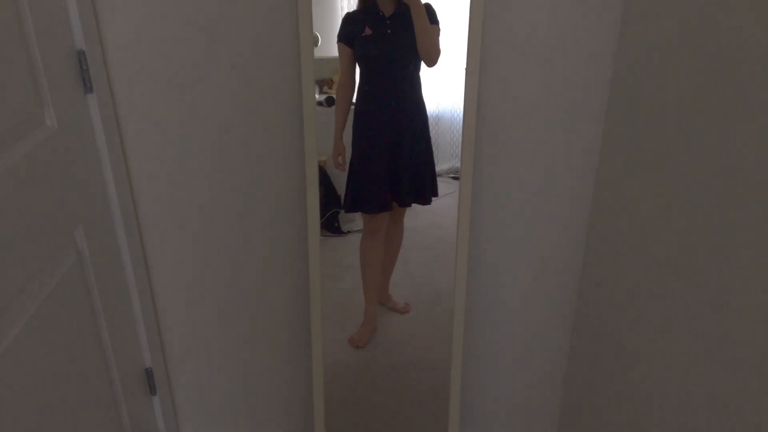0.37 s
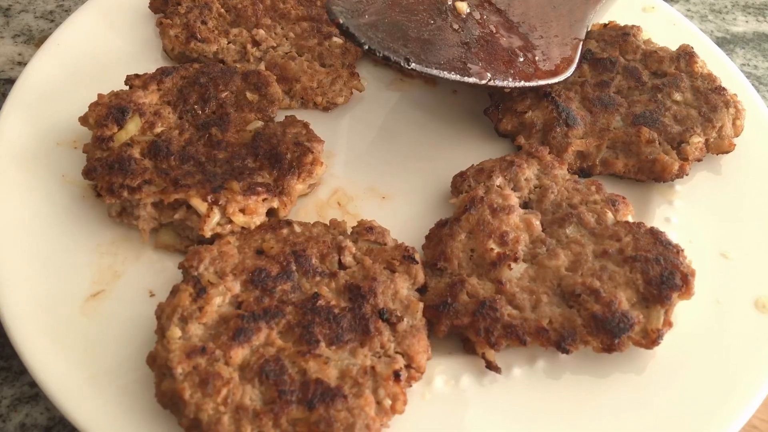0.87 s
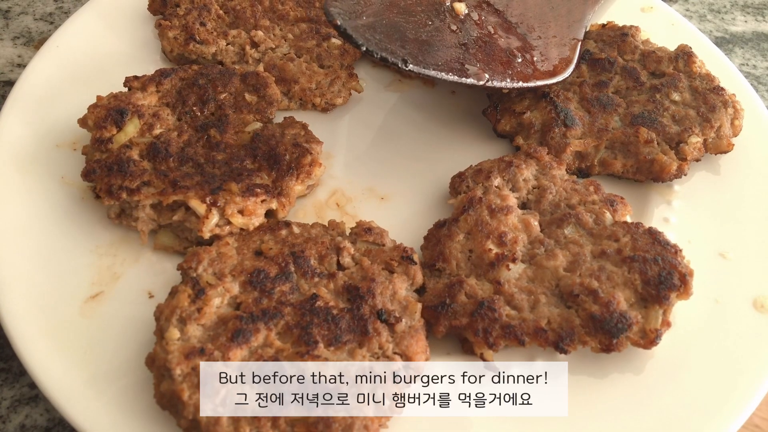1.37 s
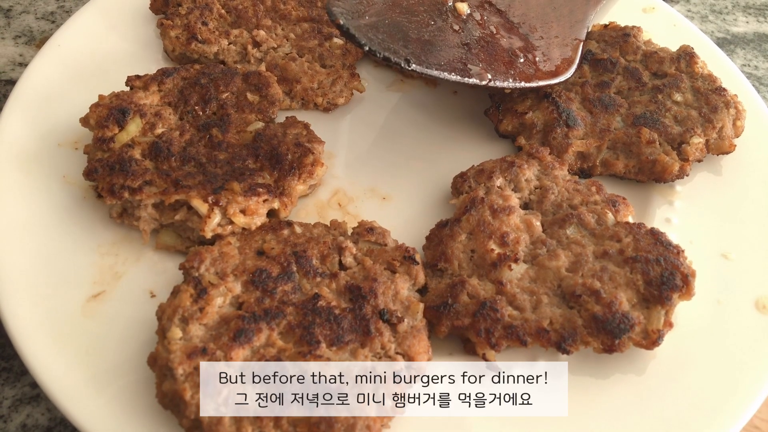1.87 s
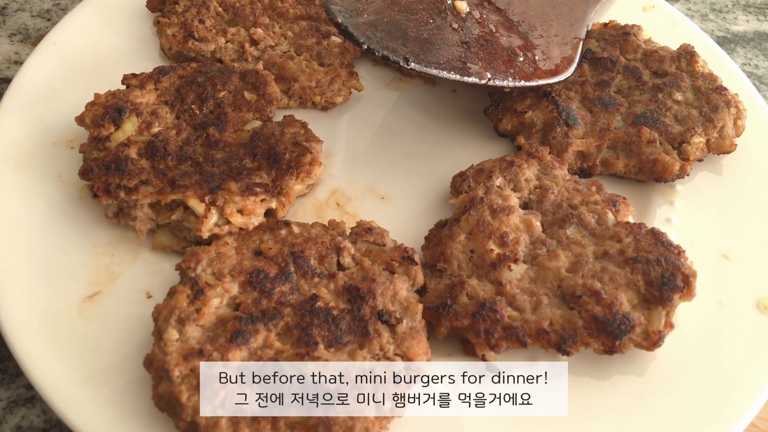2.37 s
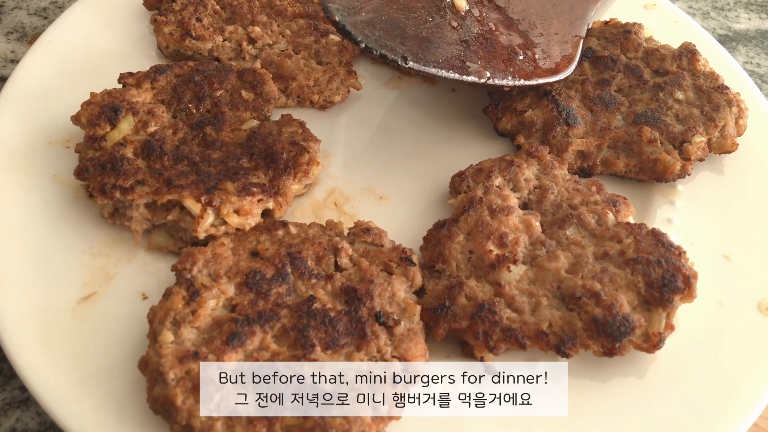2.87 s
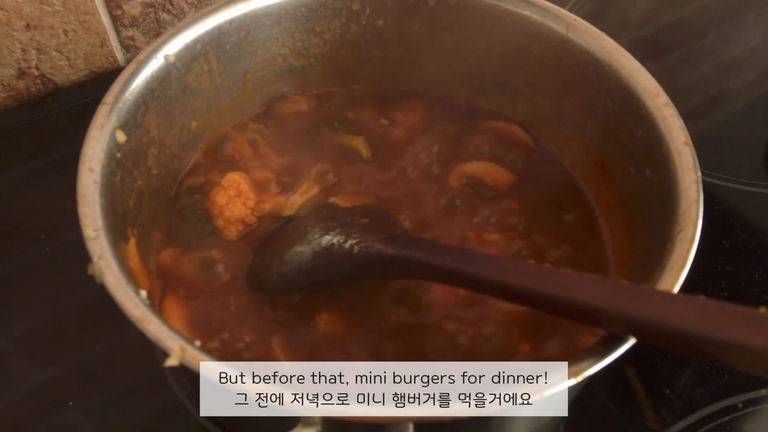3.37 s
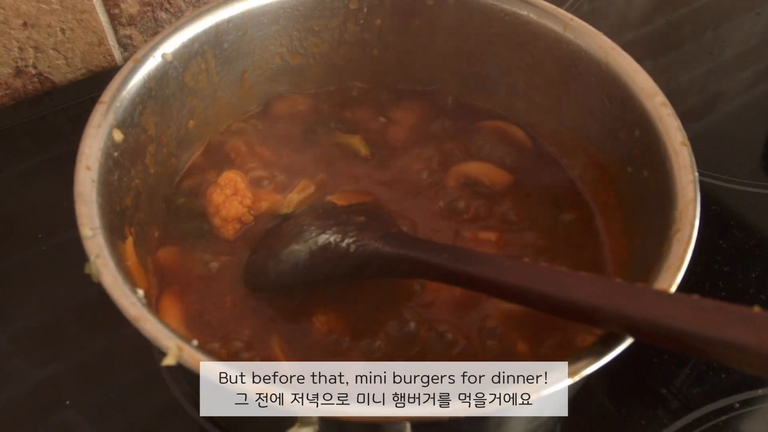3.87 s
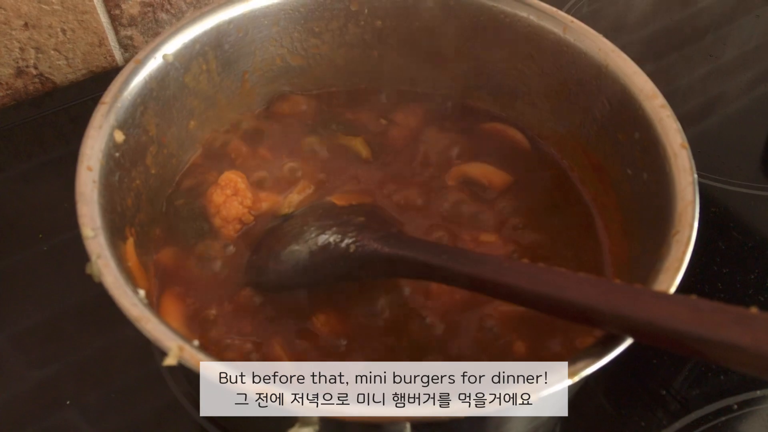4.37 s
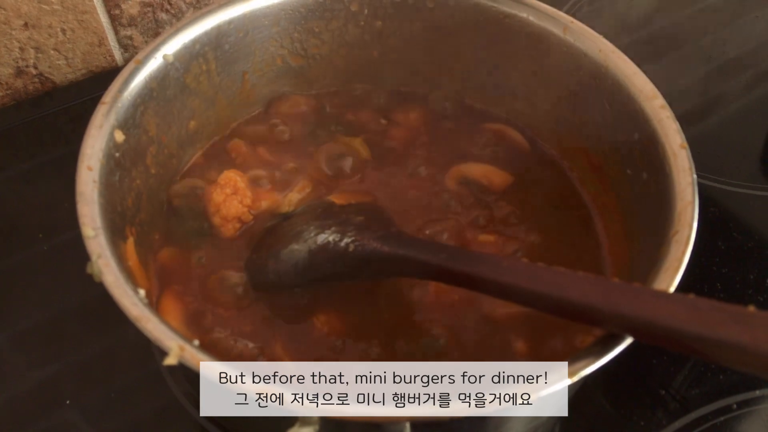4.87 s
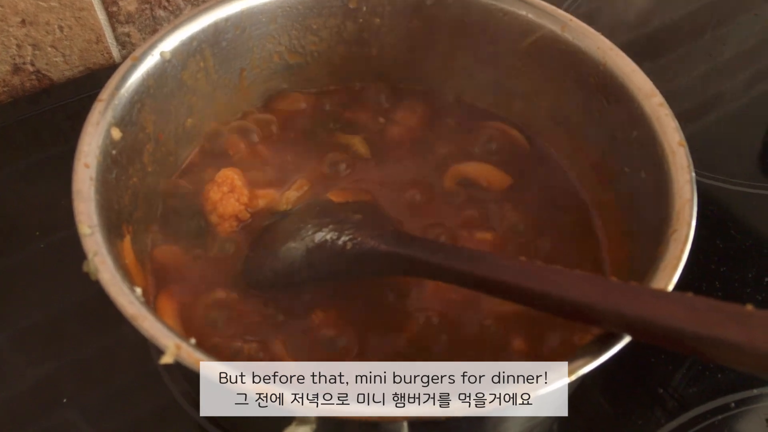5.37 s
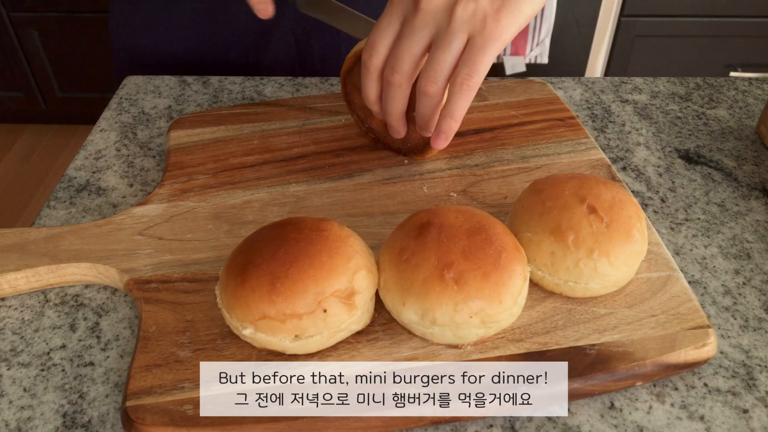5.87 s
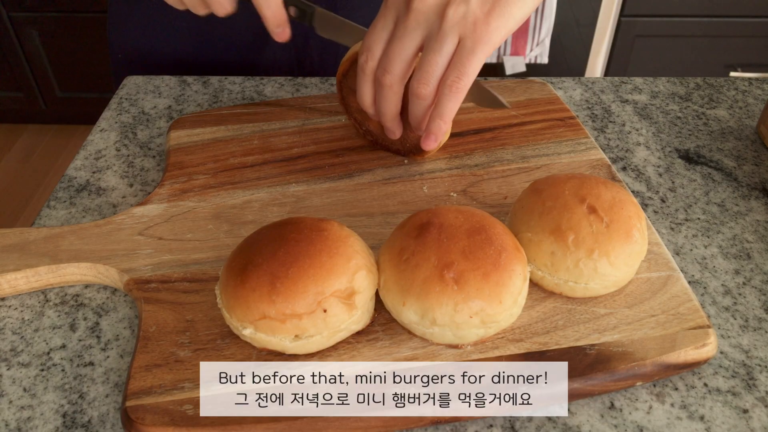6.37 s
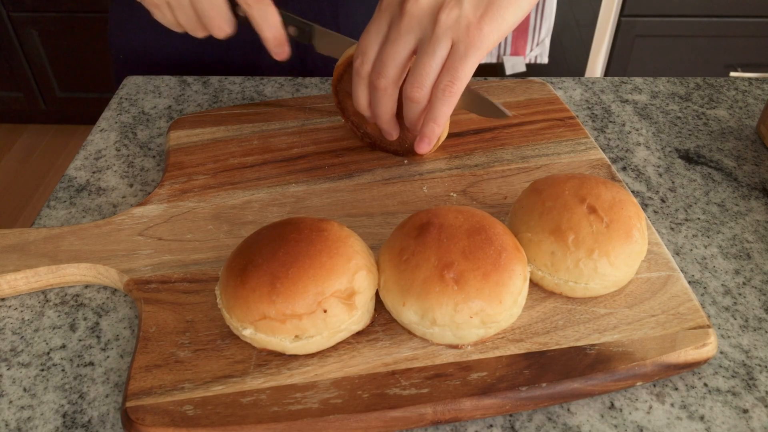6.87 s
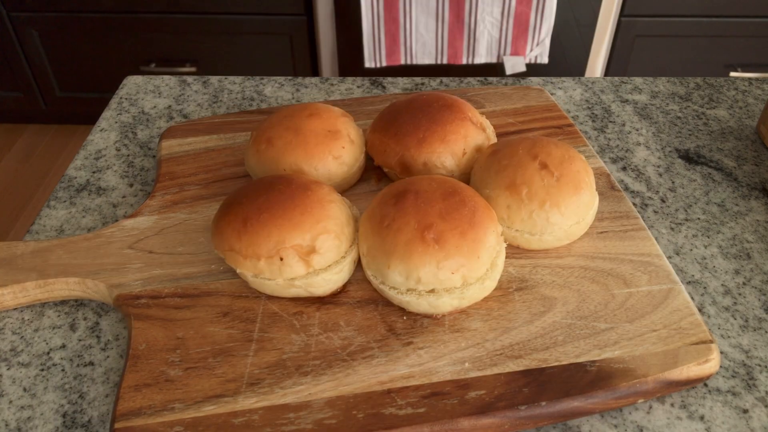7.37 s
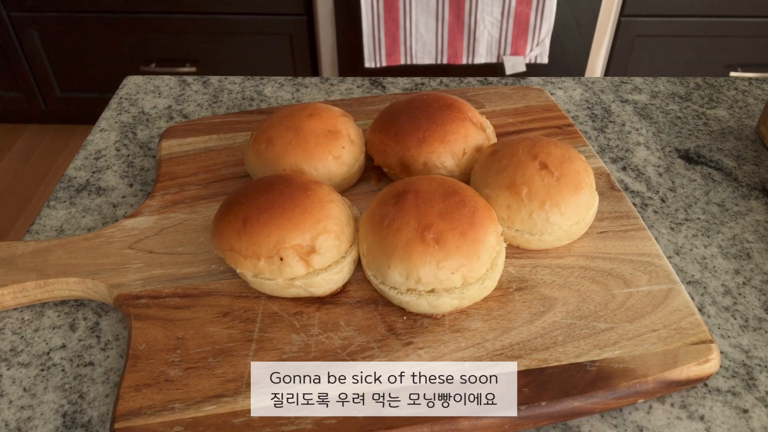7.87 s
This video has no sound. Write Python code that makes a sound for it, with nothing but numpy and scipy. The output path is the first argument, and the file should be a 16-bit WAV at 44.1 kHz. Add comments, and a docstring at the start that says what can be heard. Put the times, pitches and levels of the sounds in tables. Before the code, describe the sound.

Four indoor places joined by hard cuts, captured by a handheld microphone with light hiss and low rumble. First a still hall, then distant bubbling with a plate sliding and softly thudding, then thick stew bursting and snapping close by with a metallic hollow ring. Last, a quiet kitchen counter with a sharp wooden knock, short dull knife strokes through a bun, faint rustles and a soft bump.

```python
"""A stew close to the microphone, bubbles bursting and spitting inside a steel pot: short gliding tones,
noise ticks and dense swarms, rung by the pot. Hard cuts join four indoor places: a quiet hall; a table where
a dish is slid (tiny slips ring its modes) and set down, the pot further off; the stove; a board with a wooden
knock (rough contact, ringing modes), a knife sawing a soft bun (dense clicks), faint rustling drags and a last
soft thud. Still air and microphone hiss lie under each place, with a low room mode and camera sway."""
import sys
import numpy as np
from scipy import signal
from scipy.io import wavfile
from scipy.ndimage import uniform_filter1d

SR = 44100
rng = np.random.default_rng(int(sys.argv[2]) if len(sys.argv) > 2 else 0)


def dump(signal):
    """Clip the signal to [-1, 1] and save it as 16-bit WAV at the path in sys.argv[1]."""
    limited = np.clip(np.atleast_2d(signal).T, -1, 1)
    pcm = np.round(limited * 32767).astype(np.int16)
    wavfile.write(sys.argv[1], SR, pcm)


def volts_from_db(level):
    """Convert decibel levels to linear amplitude ratios."""
    exponent = np.asarray(level, float) / 20
    return 10 ** exponent


N = 352524
T = np.arange(N) / SR  # s


def evened(x):
    """Scales to rms 1."""
    return x / np.sqrt(np.mean(x ** 2) + 1e-20)


def read(points, hz):
    """Reads a curve of (f/Hz, value) points on a log-frequency axis."""
    f, value = np.transpose(points)
    return np.interp(np.log(hz + 1), np.log(f + 1), value)


def add(mix, s, sound):
    """Mixes a sound in at time s."""
    part = mix[round(s * SR):][:len(sound)]
    part += sound[:len(part)]


def curve(rows, length=None, axis=-1, peak=0.6, power=2):
    """Sum of arches, one a row from its start, highest at the share peak of its length."""
    out = np.zeros(N)
    for row in rows:
        u = np.linspace(0, 1, int((length or row[1]) * SR))
        arch = np.sin(np.pi * u ** (np.log(.5) / np.log(peak))).clip(0) ** power
        add(out, row[0], volts_from_db(row[axis]) * arch)
    return out


# when each place is heard: start t/s, end t/s
HALL = (0, .6575)
TABLE = (.6575, 2.9642)
STOVE = (2.9725, 5.464)
BOARD = (5.464, 8)


def during(shot):
    """1 while the shot lasts, 0 elsewhere."""
    return (T >= shot[0]) & (T < shot[1])


def coloured(x, points):
    """Causal minimum-phase filter with the given spectrum: f/Hz, level/dB."""
    log_gain = np.log(volts_from_db(np.maximum(read(points, np.fft.rfftfreq(8192, 1 / SR)), -100)))
    circle = np.r_[log_gain, log_gain[-2:0:-1]]
    response = np.fft.ifft(np.exp(np.conj(signal.hilbert(circle)))).real[:4096]
    return signal.oaconvolve(x, response)[:len(x)]


def resonate(x, hz, width):
    """One resonance of gain 1, width in Hz; hz may be a curve."""
    if np.ndim(hz):
        turn, r = np.exp(2j * np.pi * np.cumsum(hz) / SR), np.exp(-np.pi * width / SR)
        return 2 * (turn * signal.lfilter([1 - r], [1, -r], x / turn)).real
    pole = np.exp((2j * np.pi * hz - np.pi * width) / SR)
    return 2 * signal.lfilter([1 - abs(pole)], [1, -pole], x).real


def slow(per_s):
    """Slow chance, rms 1."""
    size = int(SR / per_s)
    return evened(uniform_filter1d(uniform_filter1d(rng.standard_normal(N), size), size))


def train(per_s, spread_db):
    """Sparse clicks of random sign and exponentially spread dB; a negative spread makes some weaker."""
    size = volts_from_db(spread_db * np.minimum(rng.exponential(1, N), 4)) * rng.choice([-1, 1], N)
    return size * (rng.random(N) < per_s / SR)


def bubble(hz, cycles, rise=0.055, soft=0.024):
    """A cavity rings for a few cycles, its pitch rising as it opens; peak 1."""
    u = np.arange(int(3 * cycles * SR / hz)) * hz / SR / cycles
    ring = (1 - np.exp(-u / soft)) * np.exp(-2.2 * u) * np.sin(2 * np.pi * cycles * (u + rise * u ** 2))
    return ring / abs(ring).max()


# decay of the kitchen: f/Hz, t60/s
KITCHEN = [(100, 0.22), (260, 0.63), (700, 0.87), (1840, 0.27), (4850, 0.3)]


def room(x, first_s=0.00235):
    """Diffuse tail of energy 1, each band dying at its own speed."""
    hz, t, z = signal.stft(rng.standard_normal(SR) * (T[:SR] > first_s), SR, nperseg=256)
    tail = signal.istft(z * volts_from_db(-60 * t / read(KITCHEN, hz)[:, None]), SR, nperseg=256)[1]
    return signal.oaconvolve(x, tail / np.linalg.norm(tail))[:N]


# still air and microphone hiss, one row a place: (spectrum of f/Hz, relative level/dB per Hz), rms level/dB
AIR = [([(41, -28), (70, -19), (103, -17), (810, -15), (6830, -17.5), (10500, -20), (13500, -15.5),
       (15800, -20.5)], -68.5), ([(41, -55), (70, -3), (158, 3), (203, -23), (313, -3), (740, -20.5),
       (994, -19), (2150, -24), (2460, -20), (5830, -27), (15800, -67)], -55.5), ([(41, -43), (70, 7.5),
       (291, 5.5), (501, -17.5), (1390, -22), (1700, -54), (2390, -47), (3510, -19), (3840, -18),
       (5510, -54.5), (7560, -28.5), (15600, -29)], -63), ([(41, -11.5), (70, -16.5), (103, -6), (150, -14),
       (286, -14), (590, -21), (950, -25.5), (5080, -34), (12300, -37), (15800, -43)], -58.5)]


def air():
    """Each place has its own floor of coloured noise."""
    out = np.zeros(N)
    for shot, (colour, db) in zip((HALL, TABLE, STOVE, BOARD), AIR):
        out += during(shot) * volts_from_db(db) * evened(coloured(rng.standard_normal(N), colour))
    return out


# faint electric whine at the board: width/Hz, rms level/dB
WHINE = (10, -84.5)


def whine():
    """A very narrow band of noise stands for the faint electric whine."""
    width, db = WHINE
    return during(BOARD) * volts_from_db(db) * evened(resonate(rng.standard_normal(N), 12538, width))


def wandering_tone(hz, wander_hz, per_s):
    """A sine of rms 1 whose pitch drifts slowly."""
    return np.sqrt(2) * np.sin(2 * np.pi * np.cumsum(hz + wander_hz * slow(per_s)) / SR)


# room mode in the hall, at the table, at the stove: rms level/dB
MODE_DB = [-61.5, -49, -58]
# the mode swells after blows and pushes on the board: start t/s, level/dB
BOOMS = [(5.5, -58), (5.83, -43), (6.1, -49.5), (6.4, -49), (6.61, -54), (6.95, -58), (7.47, -37)]


def room_mode():
    """The low mode is narrow noise in the first three places, a swelling tone at the board."""
    mode_hz = 53.6
    boom = evened(resonate(rng.standard_normal(N), mode_hz, 11.0))
    out = boom * sum(during(shot) * volts_from_db(db) for shot, db in zip((HALL, TABLE, STOVE), MODE_DB))
    swell = volts_from_db(-53.5) + curve(BOOMS, 0.3, peak=0.31)  # resting level plus swells of 0.3 s
    return out + during(BOARD) * swell * wandering_tone(mode_hz, 1.5, 3.4)


# the hand-held camera is jarred: t/s, peak level/dB
JOLTS = [(0.373, -41), (0.795, -39), (1.346, -37.5), (1.846, -41), (2.579, -45)]
# at the board the stand is set swaying: start t/s, level/dB
NUDGES = [(5.45, -40), (6.52, -43), (7.2, -39), (7.4, -44.5), (7.75, -47.5)]


def camera_motion():
    """Jolts are short low rings; the swaying stand is a wandering tone below hearing pitch."""
    out = np.zeros(N)
    for s, db in JOLTS:
        add(out, s, volts_from_db(db) * bubble(hz=31.6, cycles=5.7, rise=0, soft=0.033))
    sway = volts_from_db(-50.5) + curve(NUDGES, 0.72, peak=0.15)  # resting level plus nudges of 0.72 s
    return out + during(BOARD) * sway * wandering_tone(10.5, 1.26, 3.61)


# dull shoves around the table: start t/s, length/s, level/dB
SHOVES = [(1.61, 0.078, -49.5), (1.98, 0.12, -56.5), (2.19, 0.21, -52), (2.52, 0.092, -43)]


def bustle():
    """Dull movement around the table is low noise that grows through the shot, with shoves in it."""
    start_db, db_per_s = -68, 6
    level = during(TABLE) * volts_from_db(start_db + db_per_s * (T - TABLE[0])) + curve(SHOVES)
    colour = [(60, -48.0), (100, 6.5), (350, 9.5), (900, -25.5)]  # f/Hz, level/dB per Hz
    return level * evened(coloured(rng.standard_normal(N), colour))


# modes of the china: f/Hz, width/Hz, relative level/dB (the lowest takes its level from the pushes)
DISH = [(1550, 57, 0), (2243, 85, -6), (3455, 92, -14.5), (4820, 82, -24.5), (6320, 150, -21.5)]
# the dish is pushed in jerks: start t/s, length/s, upper modes level/dB, lowest mode level/dB
PUSHES = [(2.01, 0.26, -51.5, -69.5), (2.165, 0.041, -52, -70), (2.23, 0.14, -48.5, -51.5),
          (2.355, 0.12, -47.5, -61), (2.455, 0.2, -46.5, -55), (2.575, 0.12, -45.5, -55),
          (2.74, 0.059, -47, -47)]


def dish():
    """Tiny slips of the foot ring on the table excite the china."""
    span = slice(int(PUSHES[0][0] * SR), int(TABLE[1] * SR))
    slips = train(900 * np.exp(1.1 * slow(45)), spread_db=3.0)
    grip = 1 + 0.012 * slow(21)[span]  # the pitch shifts a little with the grip
    modes = np.zeros((len(DISH), N))
    for mode, (hz, width, _) in zip(modes, DISH):
        once = resonate(slips[span], hz * grip, width)
        mode[span] = evened(resonate(once, hz * grip, 2 * width))
    upper = sum(volts_from_db(row[2]) * mode for row, mode in zip(DISH[1:], modes[1:]))
    scrape = coloured(slips, [(300, 24.0), (1500, 22.0), (5000, 4.5), (12000, -47)])
    upper += volts_from_db(-4.5) * evened(scrape)
    return curve(PUSHES, axis=2, peak=0.099) * upper + curve(PUSHES, peak=0.36) * modes[0]


def ringing(modes, noise, strike_db, damped):
    """Modes rattle unevenly over their t60; the clean struck tones last the share damped of it."""
    u = T[:len(noise)]
    out = np.zeros(len(u))
    for hz, level_db, t60 in modes:
        rattle = evened(resonate(resonate(noise, hz, 110), hz, 110))
        out += volts_from_db(level_db - 60 * u / t60) * rattle
        struck = (1 - np.exp(-u * hz / 2)) * np.sin(2 * np.pi * hz * u)
        out += volts_from_db(strike_db + level_db - 60 * u / t60 / damped) * struck
    return out


def blows(rows, colour, wet_db, modes=(), modes_db=0., strike_db=0., damped=0.11, rise=0.23):
    """Each blow is a short rough contact in the colour of the body, which rings its modes and the room."""
    out, push, u = np.zeros(N), np.zeros(N), T[:SR // 2]
    click = coloured(1. * (u == 0), colour)
    click = click / np.linalg.norm(click)
    for (s, db, contact), (grit, rattle) in zip(rows, rng.standard_normal((len(rows), 2, len(u)))):
        force = (1 - np.exp(-u / contact / rise)) * np.exp(-u / contact)
        hit = coloured(grit * force, colour)
        hit = uniform_filter1d(hit, size=5)  # the straight path is duller than what the walls return
        pole = np.exp(-2 * np.pi * 6190 * volts_from_db(0.4 * db) / SR)  # weaker blows are duller
        hit = signal.lfilter([1], np.convolve([1, -pole], [1, -pole]), hit)
        ring = signal.lfilter([1 - pole], [1, -pole], ringing(modes, rattle, strike_db, damped))
        ring = volts_from_db(modes_db) * ring * np.minimum(u / 0.006, 1)
        add(out, s, volts_from_db(db) * (hit / abs(hit).max() + ring))
        add(push, s, volts_from_db(db) * click * np.sqrt(contact * SR))
    return out + volts_from_db(wet_db) * room(push)


# thuds at the table: t/s, peak level/dB, contact/s
THUDS = [(2.594, -26, 0.011), (2.746, -21, 0.02)]
# their colour: f/Hz, level/dB per Hz
THUD = [(41, -4.5), (70, -12.5), (145, 2), (178, -32), (210, -8), (341, -10), (718, -7.5), (1300, -13),
        (6000, -68), (9000, -81)]


def dish_set_down():
    """Long soft contacts without modes set the dish down."""
    return blows(THUDS, THUD, wet_db=-6.0, rise=0.37)


# wooden knocks at the board: t/s, peak level/dB of the contact, contact/s
KNOCKS = [(5.838, -3.5, 0.0042), (5.889, -22, 0.00077), (5.952, -22, 0.0078), (6.184, -31.5, 0.0019)]
# their colour: f/Hz, level/dB per Hz
KNOCK = [(41, -9), (70, -33), (140, 1.5), (190, -16), (252, -5), (395, -13.5), (451, -6), (757, -1.5),
         (1160, -6.5), (1330, -5.5), (2430, -7), (2800, -8), (3730, -31), (6250, -27.5), (15000, -45)]
# modes of the wood: f/Hz, relative level/dB, t60/s
WOOD = [(239, -9.5, 0.95), (634, -17.5, 0.58), (871, 5, 0.465), (1328, -1, 0.55), (1540, -8.5, 0.687),
        (1910, -22, 0.93), (1970, -9.5, 0.6), (2600, -9, 0.23)]


def wooden_knock():
    """Short contacts ring the modes of the wood, soon damped but for the rattle."""
    return blows(KNOCKS, KNOCK, wet_db=-11.5, modes=WOOD, modes_db=-21.5, strike_db=6.5)


# last soft bumps: t/s, peak level/dB of the contact, contact/s
BUMPS = [(7.402, -42.5, 0.0078), (7.479, -39, 0.015), (7.523, -52, 0.0058)]
# their colour: f/Hz, level/dB per Hz
BUMP = [(59, -55), (100, -6.5), (401, -0.5), (538, -12), (4000, -27), (6000, -75)]
# what the soft bumps ring with: f/Hz, relative level/dB, t60/s
COUNTER = [(199, 8.5, 0.31), (336, 2, 0.17)]


def soft_bumps():
    """Dull contacts ring the two low modes of the counter."""
    return blows(BUMPS, BUMP, wet_db=-6.0, modes=COUNTER, modes_db=-18.5, strike_db=12, damped=0.57)


# colours of crumb, crust and edge hiss: f/Hz, level/dB per Hz
CRUMB = [(150, -33), (330, 5), (900, -0.5), (1400, -3.5), (1900, -9.5), (2250, -19), (2600, -6.5),
         (3300, -38)]
CRUST = [(1500, 6.5), (2800, 5), (7000, -2), (10000, -25)]
EDGE = [(5000, -7), (8000, -1), (9800, -1), (12500, -8), (16000, -14)]
# teeth catch on the crust: t/s, level/dB
CATCHES = [(6.358, -49), (6.379, -42), (6.42, -42), (6.508, -44), (6.70, -40.5), (6.745, -50)]
# strokes of the blade; the last two rows are faint rustling drags across the board after the cut:
# start t/s, length/s, crumb level/dB, crust level/dB, edge hiss level/dB
STROKES_AND_DRAGS = [(5.48, 0.21, -60.5, -69, -74), (6.008, 0.2, -53, -65, -69),
                     (6.342, 0.13, -55, -75, -65), (6.56, 0.22, -55.5, -67, -67),
                     (6.826, 0.15, -54.5, -72, -66.5), (7.04, 0.3, -59, -52, -59.5),
                     (7.137, 0.4, -88, -59.5, -66), (7.673, 0.25, -85, -74, -71)]


def knife_and_drags():
    """Teeth drag through crumb and crust in dense clicks, with edge hiss; faint drags reuse these layers."""
    crumb = evened(coloured(train(2500, spread_db=3.0), CRUMB))
    crust = evened(coloured(train(6000, spread_db=-3.5), CRUST))
    edge = evened(coloured(rng.standard_normal(N), EDGE))
    out = np.zeros(N)
    for (s, db), grit in zip(CATCHES, rng.standard_normal((len(CATCHES), 300))):
        snag = evened(coloured(grit, [(300, -7.5), (900, 2), (12000, -17)]))
        add(out, s, volts_from_db(db) * snag * np.exp(-T[:300] / 0.0017) / 2)
    cut_s = 7.245  # a later moment at the board cuts the long stroke off; only drags are heard after it
    for row in STROKES_AND_DRAGS:
        heard = T < cut_s if row[0] + row[1] / 2 < cut_s else T >= cut_s
        for column, layer in enumerate((crumb, crust, edge), start=2):
            out += heard * curve([row], axis=column, peak=0.46, power=0.68) * layer
    return out


def swarm(per_s, low_hz, high_hz, cycles, spread_db, count=14):
    """Many unlisted bubbles of mixed sizes, rms 1."""
    clicks, kind = train(per_s, spread_db), rng.integers(0, count, N)
    out = np.zeros(N)
    for k, hz in enumerate(np.geomspace(low_hz, high_hz, count)):
        out += signal.oaconvolve(clicks * (kind == k), bubble(hz, cycles, rise=0.11))[:N]
    return evened(out)


# air in the pot: f/Hz, width/Hz, level/dB
POT = [(950, 224, 3), (1200, 73, -3.5), (1700, 157, 6), (3590, 120, 8)]


def pot_ring(x, hollow):
    """The air in the pot answers at its resonances."""
    return sum(volts_from_db(db) * resonate(x, hz, width) for hz, width, db in hollow)


# the clearest bubbles: t/s, peak level/dB before the pot rings, f/Hz
BUBBLES = [(0.696, -44.5, 1150), (0.863, -47, 1060), (0.918, -48, 2600), (1.079, -47, 920),
           (1.195, -43.5, 1030), (1.324, -45.5, 970), (1.435, -45.5, 970), (1.452, -43.5, 980),
           (1.539, -42, 3840), (1.574, -43.5, 1000), (1.636, -52, 3960), (1.89, -44, 5100),
           (1.953, -45, 860), (2.117, -42, 3700), (2.39, -43, 3200), (3.031, -36, 1700), (3.18, -41, 5330),
           (3.198, -46, 1580), (3.218, -41, 910), (3.25, -40, 1550), (3.283, -53, 3270), (3.296, -40, 1650),
           (3.336, -46, 1200), (3.347, -45, 4500), (3.369, -51, 950), (3.435, -35, 1620),
           (3.446, -32, 1760), (3.485, -37, 1750), (3.623, -36.5, 1800), (3.579, -41, 3650),
           (3.697, -41.5, 3420), (3.778, -41.5, 1000), (3.797, -39, 974), (3.819, -34.5, 1550),
           (3.904, -40, 1100), (3.971, -40, 925), (3.99, -35, 1860), (4.029, -41.5, 2900),
           (4.06, -40, 1570), (4.069, -45, 2800), (4.132, -54, 1240), (4.147, -40.5, 1070),
           (4.198, -46, 5700), (4.219, -42, 3500), (4.236, -39, 1600), (4.266, -37.5, 3380),
           (4.394, -45, 3380), (4.542, -42, 4760), (4.569, -49, 950), (4.625, -37, 5370),
           (4.657, -34, 1540), (4.673, -45, 5760), (4.698, -43, 1020), (4.766, -49, 3400),
           (4.798, -33, 1580), (4.829, -38, 1810), (4.94, -40, 1740), (4.942, -39, 4100),
           (4.999, -43, 3400), (5.034, -36, 974), (5.084, -37.5, 3300), (5.104, -34, 2060),
           (5.119, -42, 4260), (5.159, -35.5, 950), (5.182, -41.5, 3530), (5.212, -38, 1580),
           (5.284, -54, 3570), (5.325, -36.5, 880), (5.34, -38, 1700), (5.377, -42.5, 3400),
           (5.421, -37.5, 1590)]


def bursting_bubbles(hollow):
    """Each burst is a short ring gliding up; smaller bubbles ring more cycles and glide less."""
    pops = np.zeros(N)
    chance = np.exp(0.24 * rng.standard_normal((len(BUBBLES), 2)))
    for (s, db, hz), (longer, steeper) in zip(BUBBLES, chance):
        khz = hz / 1000
        cycles, glide = longer * 5.2 * khz ** 0.35, steeper * 0.14 / khz
        add(pops, s, volts_from_db(db) * bubble(hz, cycles, glide, soft=0.022))
    return pops + volts_from_db(-11.0) * pot_ring(pops, hollow)


# skins that snap and spit: t/s, level/dB
SNAPS = [(0.705, -43), (0.801, -43), (1.085, -53), (1.997, -25.5), (2.9848, -31.5), (3.0425, -22.5),
         (3.084, -25.5), (3.103, -23), (3.1396, -35.5), (3.197, -34.5), (3.2977, -40), (3.3866, -25.5),
         (3.5403, -23), (3.596, -31), (3.645, -28), (3.698, -25.5), (3.8035, -42), (3.819, -23.5),
         (3.974, -26.5), (4.0075, -30), (4.0807, -33.5), (4.0996, -31), (4.2953, -28), (4.4113, -37),
         (4.486, -31.5), (4.5827, -33.5), (4.7913, -24.5), (4.9087, -28), (5.0938, -25.5), (5.185, -28.5),
         (5.2587, -31), (5.295, -34), (5.3365, -33.5), (5.3884, -28)]


def snapping_skins():
    """Each skin is a sharp noise tick inside a short lumpy spray."""
    snaps, u = np.zeros(N), T[:900]
    lead_s = 0.006  # the spray sets in just before the tick
    noise = rng.standard_normal((len(SNAPS), 900))
    droplets = np.exp(0.54 * evened(uniform_filter1d(rng.standard_normal(noise.shape), 40)))  # uneven
    for (s, db), hiss, lumps in zip(SNAPS, noise, droplets):
        tick = 0.5 * np.exp(-abs(u - lead_s) / 0.00054)
        spray = 0.069 * (u / lead_s) ** 2 * np.exp(-u / 0.0031) * lumps
        add(snaps, s - lead_s, volts_from_db(db) * hiss * (tick + spray))
    return coloured(snaps, [(1500, -11.5), (3500, -3.0), (7000, -8.0), (13000, -6.5), (16000, -15)])


def simmer(hollow):
    """Swarms of small bubbles come in clumps: full at the close stove, faint from the table."""
    flurry_s = 0.04  # each listed burst comes amid a flurry of smaller ones
    bursts = curve([(row[0] - flurry_s / 2, 0) for row in BUBBLES + SNAPS], flurry_s, peak=0.54)
    clump = np.exp(0.5 * slow(40)) * np.where(during(STOVE), 1 + 1.6 * bursts, 1 + bursts)
    churn = swarm(300 * clump, 750, 2700, cycles=3.6, spread_db=4.5)
    pot = evened(0.26 * churn + pot_ring(churn, hollow))
    fizz = swarm(400 * clump, 2760, 6980, cycles=4.6, spread_db=7)
    spit = swarm(220 * clump, 6500, 16500, cycles=1.3, spread_db=6.5)
    near = volts_from_db(-54.5) * pot + volts_from_db(-62.5) * fizz + volts_from_db(-69.0) * spit
    far = volts_from_db(-65.5) * (pot + churn)
    far += volts_from_db(-66.0) * swarm(500 * clump, 3780, 6800, cycles=5.1, spread_db=7.5)
    far += volts_from_db(-64.0) * swarm(1500 * clump, 6000, 11000, cycles=0.62, spread_db=1.5)
    return during(STOVE) * near + during(TABLE) * far


def stew():
    """Bubbles burst, spit and simmer; the pot rings and its steel walls scatter the sound."""
    # the heaving surface shifts the pot's resonances
    hollow = [(hz * (1 + 0.045 * slow(30)), width, db) for hz, width, db in POT]
    direct = bursting_bubbles(hollow) + snapping_skins() + simmer(hollow)
    walls = rng.standard_normal(2600) * volts_from_db(-60 * T[:2600] / 0.017)  # t60 17 ms
    return direct + volts_from_db(-9.5) * signal.oaconvolve(direct, walls / np.linalg.norm(walls))[:N]


def scene():
    """All sources in their places, cut shot by shot."""
    background = air() + whine() + room_mode() + camera_motion() + bustle()
    china = dish()
    table = dish_set_down() + china + volts_from_db(3.5) * room(china)
    board = wooden_knock() + soft_bumps() + knife_and_drags()
    pot = stew()
    pot = pot + volts_from_db(np.where(during(TABLE), -3., -14.)) * room(pot)  # more room from further off
    mix = background + during(TABLE) * table + board + (during(TABLE) | during(STOVE)) * pot
    return mix[None]


def band_limit(x):
    """A steep low-pass at the top of the band."""
    return signal.sosfilt(signal.butter(12, 16690, fs=SR, output="sos"), x)


def record(dry):
    """Passes the finished mix through the steep low-pass at the top of the band, with no further gain."""
    return band_limit(dry)


dry = scene()
out = record(dry)
dump(out)
```